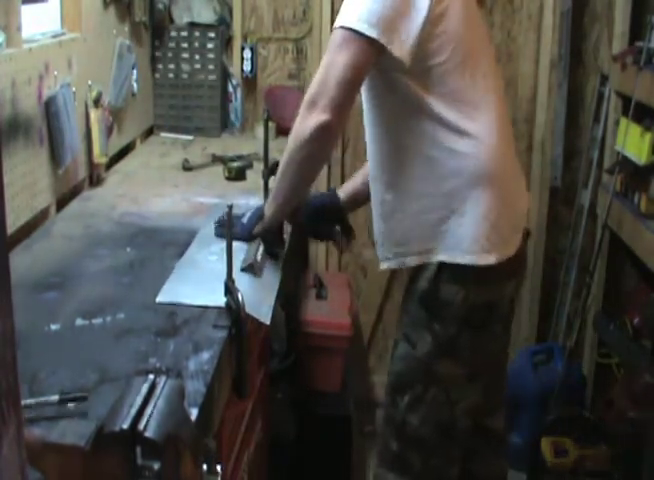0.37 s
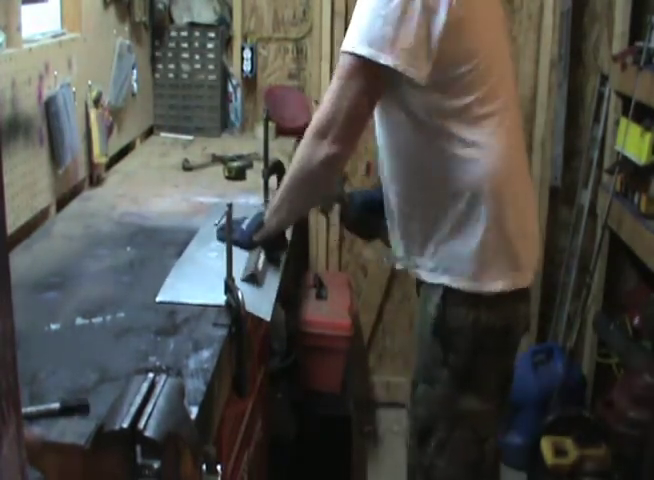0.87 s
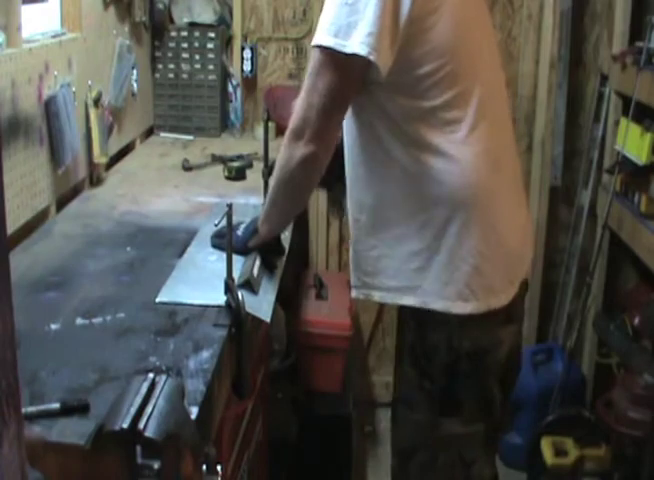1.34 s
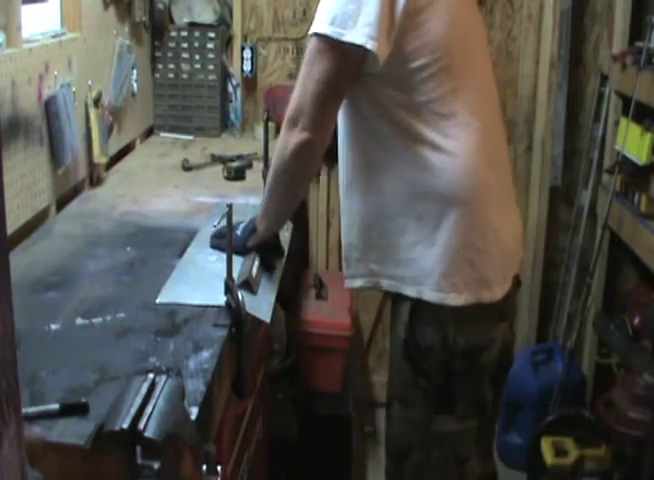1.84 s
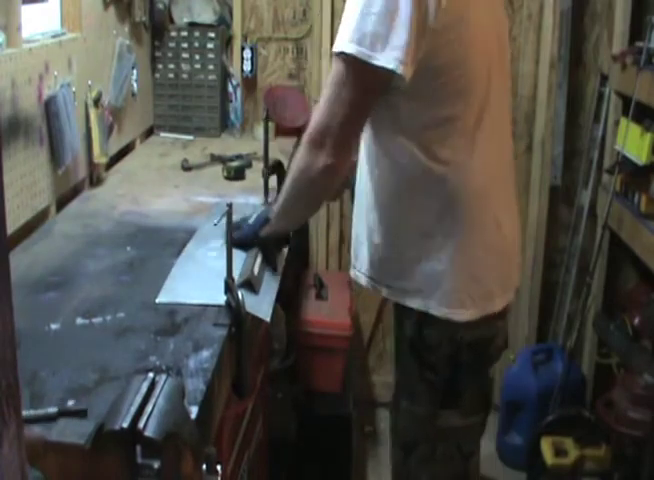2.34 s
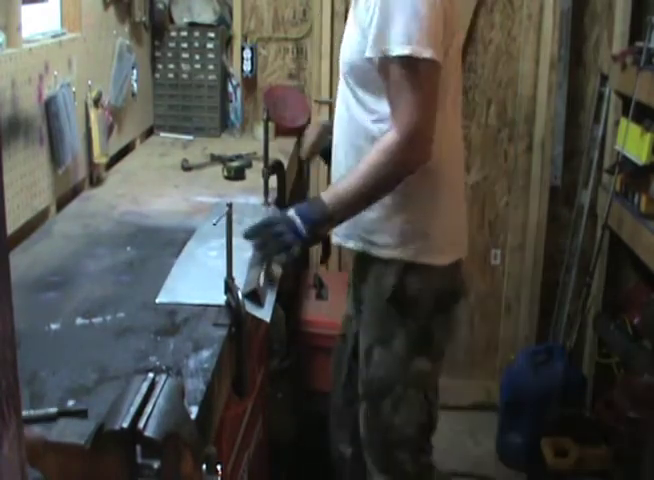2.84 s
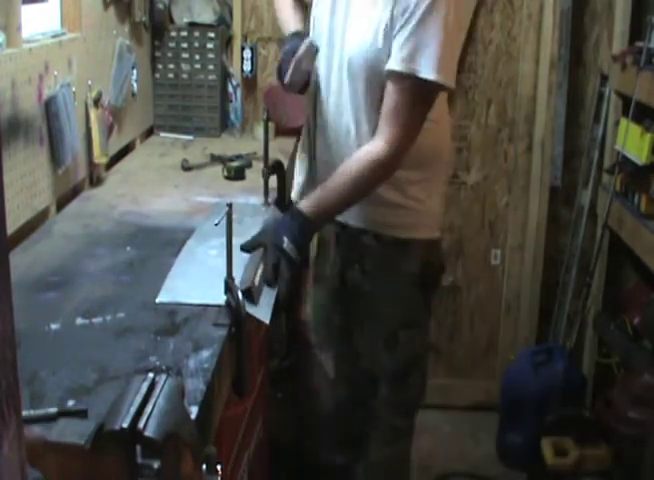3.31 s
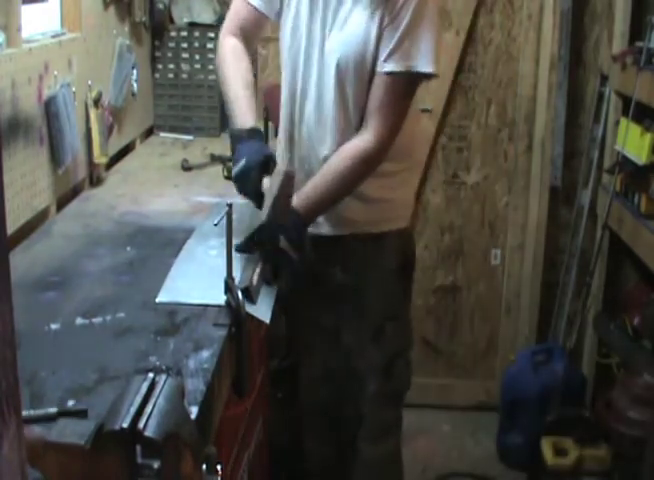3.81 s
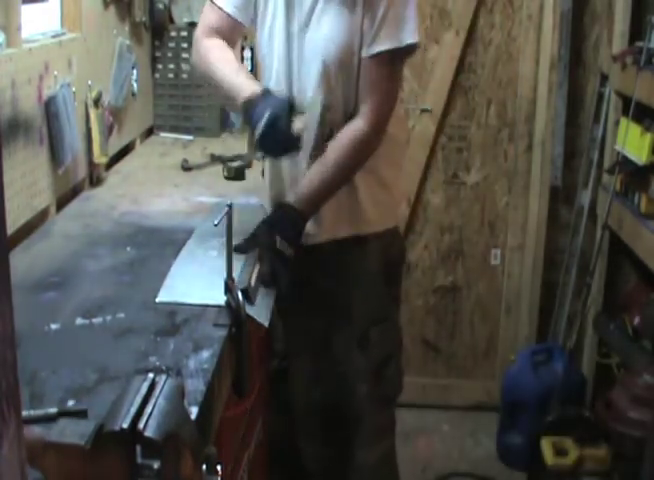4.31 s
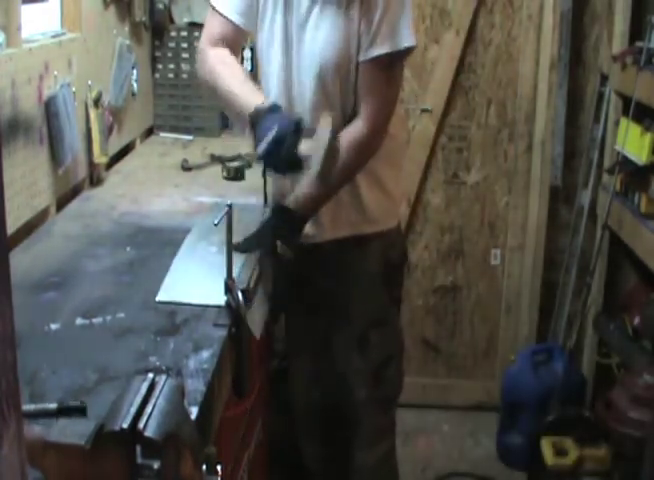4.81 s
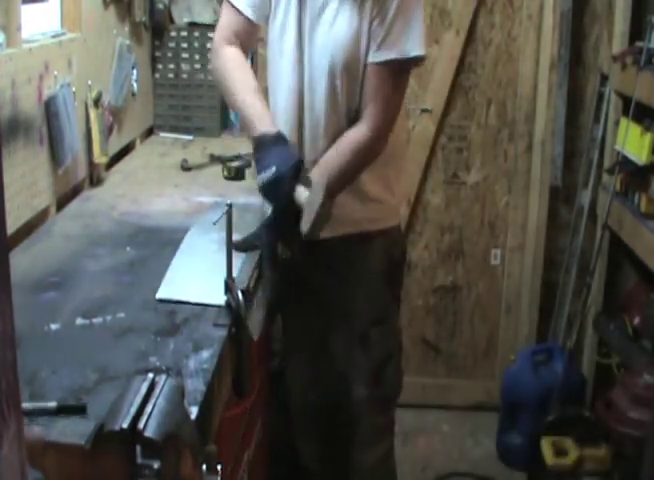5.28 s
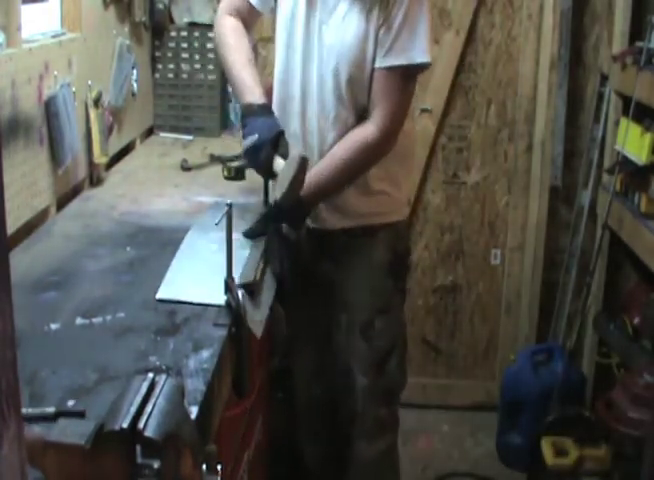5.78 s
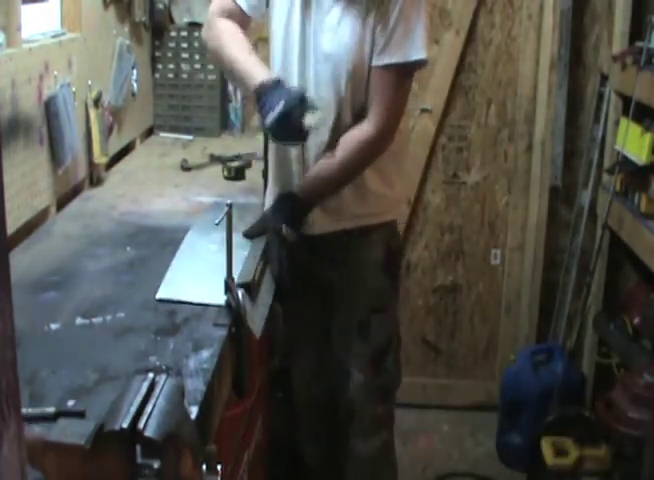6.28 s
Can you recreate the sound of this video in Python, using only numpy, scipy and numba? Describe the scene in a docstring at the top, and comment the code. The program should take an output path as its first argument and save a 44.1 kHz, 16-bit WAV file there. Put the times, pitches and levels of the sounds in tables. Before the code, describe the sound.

In a small wooden garage, a mallet hits sheet steel over a clamped bar. A ring is already fading at the start, then three hard, spaced clangs follow. A pause brings scraping, gritty sliding and soft bench knocks before more blows, some double and duller, ending on a very hard hit. A mono camera microphone squashes the loud hits over room noise and hum.

```python
"""A small wooden garage, one mono camera microphone: a mallet beats a steel sheet over a bar clamped to a bench.
Each blow rings sheet and bar as decaying modes over a dense noise wash that booms in the bench; it is far too loud
for the camera, whose gain control holds it down until the ring sinks. Between blows tool and gloves slide along
the metal as hissing strokes, loose parts rattle in bright bursts and the bench knocks softly as damped tones,
all over coloured room noise and a low mains hum of wavering tones."""
import sys
import numpy as np
from scipy import signal
from scipy.fft import rfft, irfft
from scipy.io import wavfile
from scipy.ndimage import uniform_filter1d, minimum_filter1d
from numba import njit

SR = 44100
rng = np.random.default_rng(int(sys.argv[2]) if len(sys.argv) > 2 else 0)


def unload_audio(sound):
    """Save the sound as a 16-bit wav file, at the path given as the first command line argument."""
    columns = np.transpose(np.atleast_2d(sound))
    # keep every value between -1 and 1, then stretch to whole-number steps
    steps = np.round(np.clip(columns, -1, 1) * 32767)
    wavfile.write(sys.argv[1], SR, steps.astype(np.int16))


def amp(db):
    return 10 ** (np.asarray(db, float) / 20)


N = 292824  # samples heard
LEAD = SR // 4  # samples of sound before time zero
HOLD_DB = -15.5  # level above which the slow gain control turns down


def level(x, db):
    """Scale to an rms level in dB."""
    return x * amp(db) / np.sqrt(np.mean(x ** 2))


def along(table, hz, column):
    """Read a table column at a pitch, on a log-frequency axis."""
    table = np.array(table, float)
    return np.interp(np.log(np.maximum(hz, 1)), np.log(table[:, 0]), table[:, column])


def coloured(x, table):
    """Give a white signal the spectrum of (Hz, dB) points."""
    bins_hz = np.fft.rfftfreq(len(x), 1 / SR)
    return irfft(rfft(x) * amp(along(table, bins_hz, column=1)), len(x))


def walk(rate, size):
    """Random levels held 1 / rate seconds and slewed twice; spread near 1."""
    k = int(SR / rate)
    steps = np.repeat(rng.standard_normal(size // k + 1), k)
    return 1.302 * uniform_filter1d(uniform_filter1d(steps, k), k)[:size]


def crowded(size, spread_db, spacing_hz):
    """White spectrum made lumpy by unresolved modes, some strong and some weak."""
    k = max(int(spacing_hz * size / SR), 1)
    steps = np.repeat(rng.standard_normal(size // k + 1), k)
    lumps = uniform_filter1d(steps, k)[:size // 2 + 1]
    return rfft(rng.standard_normal(size)) * amp(spread_db * lumps)


def near(hz, centre_hz, width):
    """Bell-shaped weight around a pitch, width as a log ratio."""
    return np.exp(-(np.log(hz / centre_hz) / width) ** 2)


def decay(t, t60):
    """Exponential fade that falls 60 dB in t60 seconds."""
    return np.exp(-np.log(1000) * t / t60)


def garage():
    """Room noise that swells slowly and a mains hum whose tones waver in pitch and level."""
    # Spectrum of the empty room. Each row: frequency in Hz, relative level in dB per Hz.
    room_colour = [(15, -46.5), (25, -1), (117, -3.5), (439, -6.5), (796, -3), (887, -7.5), (1480, -16.5),
                   (1650, -11), (2110, -20), (2610, -17), (3520, -24), (9320, -28.5), (16000, -36.5)]
    # Tones of the hum. Each row: frequency in Hz, rms in dB before its swells, spread of the waver in Hz.
    hum_tones = [(120.77, -52.5, 3.52), (366, -61, 3.12), (798, -58, 5.2)]
    size = N + LEAD
    room = level(coloured(rng.standard_normal(size), room_colour), -46)
    out = room * amp(1.2 * walk(3, size))
    for hz, db, waver_hz in hum_tones:
        phase = 2 * np.pi * np.cumsum(hz + waver_hz * walk(12, size)) / SR
        out += level(np.sin(phase), db) * amp(1.5 * walk(10, size))
    return out


def knocks():
    """Soft wooden bumps on the bench: one damped mode and a puff of dull noise."""
    # Each row: start in seconds, level in dB before the soft onset, pitch in Hz, t60 in seconds.
    bumps = [(2.721, -40.5, 193, 0.244), (3.514, -19.5, 231, 0.096), (3.52, -31.5, 650, 0.079),
             (3.575, -36, 242, 0.11), (5.454, -29.5, 750, 0.22), (5.455, -28, 1800, .11)]
    out, t = np.zeros(N + LEAD), np.arange(SR // 5) / SR
    for s, db, hz, t60 in bumps:
        band = signal.butter(2, [hz / 1.8, hz * 1.43], "band", fs=SR, output="sos")
        puff = signal.sosfilt(band, rng.standard_normal(len(t)))
        shape = (1 - np.exp(-t / 0.0086)) * decay(t, t60)
        mode = np.sin(2 * np.pi * hz * t)
        at = int(s * SR) + LEAD
        out[at:at + len(t)] += amp(db) * shape * (mode + level(puff, 0.5))
    return out


def slides():
    """Fine grit under tool and gloves: a dense hiss in strokes that rise and fall, each with its own body."""
    # Strokes along the metal. Each row: peak time in seconds, hiss level in dB, rise in seconds,
    # fall in seconds, level of the body over the hiss in dB before its deep part is thinned.
    strokes = [(.352, -46.5, 0.041, 0.036, 4), (.70, -53, 0.1, .12, 6), (.855, -23.5, 0.066, 0.34, -3),
               (1.07, -37.5, 0.18, 0.092, 3.5), (1.25, -40.5, .07, 0.037, 3.5),
               (1.34, -50.5, 0.18, 0.14, 1), (1.465, -43.5, .03, 0.07, -3), (1.905, -51.5, 0.018, 0.045, 1),
               (1.965, -49.5, .04, 0.029, 3.5), (2.39, -42.5, 0.12, 0.14, -1), (2.641, -29, 0.15, 0.14, -3),
               (2.66, -38.5, 0.072, 0.066, 10), (2.865, -49.5, 0.18, 0.08, 3.5),
               (3.045, -54.5, .07, .07, 5), (3.16, -44.5, 0.039, 0.072, 0.5), (3.3, -42, 0.076, .12, 2.5),
               (3.38, -42, 0.12, 0.085, -4), (3.5, -50.5, 0.047, 0.1, 6), (3.629, -44.5, 0.052, 0.05, -0.5),
               (3.735, -50.5, .06, 0.085, -6), (3.87, -43, 0.071, 0.1, -2.5),
               (3.965, -38, 0.067, 0.079, -3), (4.052, -39.5, 0.027, 0.036, -1), (4.1, -46, 0.037, .04, 1),
               (4.53, -60, .05, .05, 3), (4.598, -41.5, 0.025, 0.041, 0), (4.95, -47, 0.099, 0.059, -5),
               (5.118, -47, 0.033, 0.03, -1), (5.55, -43.5, 0.22, 0.21, -0.8),
               (5.68, -39, 0.062, 0.066, -5.5), (5.825, -31.5, 0.13, 0.11, -5.5),
               (6.031, -49.5, 0.067, .11, 1.5), (6.36, -53, .11, .05, 5), (6.56, -49, 0.026, 0.053, -1)]
    # Spectrum of the grit. Each row: frequency in Hz, relative level in dB per Hz.
    grit_colour = [(180, -43.5), (300, -20), (433, -14), (634, -3.5), (1150, 3), (1390, 4), (3290, 1.5),
                   (9390, -6), (13800, -13), (16000, -22)]
    stroke_curve = 1.73  # exponent of the fade in dB: 1 pointed, 2 rounded
    body_linger = 1.32  # the body of a stroke dies this much slower than its hiss
    deep_hz, thinning = 1100, 0.32  # a louder stroke loses this many dB below deep_hz per dB of level
    size = N + LEAD
    t = (np.arange(size) - LEAD) / SR

    grains = irfft(crowded(size, 1.8, 50), size) * amp(2.0 * rng.standard_normal(size))
    grit = coloured(grains, grit_colour) * amp(1.02 * walk(60, size))
    low = signal.sosfiltfilt(signal.butter(2, 3500, fs=SR, output="sos"), grit)

    hiss_power, body_power = np.zeros(size), np.zeros(size)
    for s, db, rise, fall, body_db in strokes:
        # the hiss is 20 dB down one rise before and one fall after its peak
        span = slice(np.searchsorted(t, s - 2 * rise), np.searchsorted(t, s + 3 * fall))
        before = t[span] < s
        away = np.abs(t[span] - s) / np.where(before, rise, fall)
        hiss_power[span] += amp(2 * (db - 20 * away ** stroke_curve))
        slower = away / np.where(before, 1, body_linger)
        body_power[span] += amp(2 * (db + body_db - 20 * slower ** stroke_curve))

    low, hiss = level(low, 0), level(grit - low, 0)
    deep = signal.sosfiltfilt(signal.butter(2, deep_hz, fs=SR, output="sos"), low)
    # thinning starts where the body exceeds -39 dB, a power of amp(-78)
    thin = np.minimum(1, (amp(-78) / (body_power + 1e-12)) ** (thinning / 2))
    body = low - (1 - thin) * deep
    return np.sqrt(hiss_power) * hiss + np.sqrt(body_power) * body


def rattles():
    """Loose parts chattering against the sheet: short bright noise bursts for many tiny contacts."""
    # Each row: start in seconds, rms in dB before the burst is shaped, t60 in seconds.
    chatters = [(0.321, -39, 0.19), (0.681, -42.5, 0.12), (1.449, -41.5, 0.294), (1.897, -43, 0.08),
                (3.1305, -40.5, 0.18), (3.4685, -40, 0.145), (4.171, -21, 0.34), (4.242, -28, 0.314),
                (4.30, -32.5, 0.31), (4.785, -19, 0.148), (5.999, -45, 0.28), (6.141, -11, 0.095),
                (6.32, -35, 0.0484), (6.54, -51.5, 0.15)]
    # Spectrum of the chatter. Each row: frequency in Hz, relative level in dB per Hz.
    chatter_colour = [(400, -30.5), (1500, 11), (5000, 7.5), (10000, 4), (16000, -15)]
    out, t = np.zeros(N + LEAD + SR), np.arange(SR // 3) / SR
    for s, db, t60 in chatters:
        burst = level(coloured(rng.standard_normal(len(t)), chatter_colour), db)
        at = int(s * SR) + LEAD
        out[at:at + len(t)] += burst * (1 - np.exp(-t / .0015)) * decay(t, t60)
    return out[:N + LEAD]


def wash(t, bright_hz, boom_db, treble_db, longer):
    """Modes too dense to tell apart: each third-octave builds up and dies at its own pace, the bass late."""
    # Sheet, bench and walls after a blow. Each row: frequency in Hz, relative level in dB per Hz,
    # t60 in seconds before the blow's length factor, build-up in seconds.
    dense_modes = [(30, -8, 0.68, 0.063), (90.5, -2.5, 0.56, 0.0233), (154, -6.5, 0.48, 0.0304),
                   (222, -3.5, 0.47, 0.023), (406, -7, 0.39, 0.0096), (764, -5, 0.37, 0.0069),
                   (1437, -5.5, 0.37, 0.00059), (2400, -5, 0.39, 0.0011), (3930, -5.5, 0.34, 0.001),
                   (7000, -7, 0.28, 0.0044), (10150, -10, 0.23, 0.0035), (15770, -21.5, 0.17, 0.0017)]
    bar_hz = 690
    noise = crowded(len(t), 2.7, 50)
    bins = np.log2(np.fft.rfftfreq(len(t), 1 / SR) + 1)
    out = 0
    for octave in np.arange(14, 43) / 3:
        hz = 2 ** octave
        window = np.cos(np.pi / 2 * np.clip(3 * (bins - octave), -1, 1)) ** 2
        band = irfft(noise * window, len(t))
        boom = boom_db * (1 - 0.53 / (1 + (hz / 110) ** 4)) / (1 + (hz / 480) ** 6)
        treble = treble_db / (1 + (5000 / hz) ** 2)
        db = along(dense_modes, hz, column=1) + boom + treble
        # blows right over the bar shake the bench less and ring the bar more
        db = db - .5 * boom_db * near(hz, bar_hz, 0.27) + 3 * near(hz, bright_hz, 0.39)
        t60 = longer * along(dense_modes, hz, column=2)
        clank = amp(-7.0) * near(hz, bright_hz, 0.17) * decay(t, 0.093)
        # bench and floor rumble on faintly after the sheet has gone quiet
        rumble = amp(-31.5 - boom_db) / (1 + (hz / 600) ** 2) * decay(t, 1.96) * (1 - t)
        fade = decay(t, t60) + clank + rumble
        build_up = 1 - np.exp(-t / along(dense_modes, hz, column=3))
        out = out + amp(db) * band * fade * build_up
    return out


def rings(t, modes, bright_hz):
    """The spot that is struck favours the modes near one pitch; every blow shares its force out anew."""
    hz, db, t60 = np.transpose(modes)[:, :, None]
    luck = rng.standard_normal((len(modes), 3)).T[:, :, None]
    db = db + 2.0 * luck[0] + 7 * near(hz, bright_hz, 0.055)
    # the metal keeps flexing, so its modes drift in pitch and waver in level
    drift = 1 + 0.00316 * luck[1] + 0.0072 * np.array([walk(47.4, len(t)) for _ in modes])
    waver = amp(2.1 * np.array([walk(37.0, len(t)) for _ in modes]))
    phase = 2 * np.pi * (np.cumsum(hz * drift, axis=1) / SR + luck[2])
    return (amp(db) * waver * np.sin(phase) * decay(t, t60)).sum(axis=0)


def blows():
    """Mallet on sheet: rings over the wash; a weaker blow keeps contact longer, so it starts softer."""
    # Each row: start in seconds, strength in dB over the gain control's holding level,
    # brightest ring in Hz, boom of the bench in dB, ring length factor of the wash.
    strikes = [(-.14, 20.5, 2060, -0.5, 1.16), (0.363, 23.5, 2450, -0.4, 1.064),
               (1.5156, 20, 2030, -2, 1.17), (1.9919, 22.5, 2130, -0.5, 1.124),
               (4.116, 8.5, 2780, -4, 1.29), (4.172, 4, 1450, -6.5, 1.24), (4.6079, 23.5, 2400, -1, 1.097),
               (5.1290, 25, 3050, -1.5, 1.033), (6.1146, 8.5, 1730, -9.5, 1.13),
               (6.186, 1, 1640, -2.5, 1.2), (6.5768, 30, 1830, -4.5, 1.1)]
    # Clearest modes of the sheet. Each row: mean frequency in Hz, relative level in dB, t60 in seconds.
    sheet_modes = [(822, -6, 0.29), (960, -3, 0.153), (1310, -22, 0.26), (1738, -1, 0.28),
                   (2003, -3, 0.081), (2300, -2, 0.25), (2421, -12, 0.26), (2760, -34, 0.14),
                   (2950, -7, 0.19), (3160, -7, 0.135), (4143, -2, 0.27), (4540, -19, 0.11), (5760, -6, .2),
                   (6240, -5, 0.14), (7360, -17, 0.17), (8460, -10, 0.24), (9060, -22, 0.47)]
    # Modes of the clamped bar. Each row: mean frequency in Hz, relative level in dB, t60 in seconds.
    bar_modes = [(589, -3, 0.61), (665, 2.5, 0.4), (791, -6, 0.29), (1497, 3.5, 0.25), (1614, 3.5, 0.42),
                 (2680, -4.5, 0.36), (2950, 2, 0.41), (4340, -5, 0.29)]
    # a weak blow is dull: treble gained per dB of strength, strengths where it is neutral and stops growing
    treble_per_db, neutral_db, brightest_db = 1.04, 20.5, 22.5
    out, t = np.zeros(N + LEAD + SR), np.arange(SR) / SR
    for s, db, bright_hz, boom_db, longer in strikes:
        treble_db = treble_per_db * (min(db, brightest_db) - neutral_db)
        push = 1 - np.exp(-t * amp(db) / 0.0054)
        # right over the bar the sheet is held still and the bar rings instead
        sheet = amp(-11.5 + 0.41 * boom_db) * rings(t, sheet_modes, bright_hz)
        bar = amp(-25 - 0.95 * boom_db) * rings(t, bar_modes, bright_hz)
        # the struck sheet slaps the bar and makes the wash uneven
        clatter = amp(1.02 * walk(170.1, SR))
        sound = 3.4 * wash(t, bright_hz, boom_db, treble_db, longer) * clatter + sheet + bar
        at = int(s * SR) + LEAD
        out[at:at + SR] += amp(db + HOLD_DB) * push * sound
    return out[:N + LEAD]


@njit
def squeeze(x, peak, top, attack, release, slope):
    """Gain control: follow the peak level, smoothed twice, and turn down what exceeds the top."""
    y, follower, smooth = np.empty(len(x)), 1e-9, 1e-9
    for i in range(len(x)):
        follower += (peak[i] - follower) * (attack if peak[i] > follower else release)
        smooth += (follower - smooth) * attack
        y[i] = x[i] * min(1., (top / smooth) ** slope)
    return y


def scene():
    """The camera's gain control acts on all of it: a quick stage catches the peak, a slower one settles after it."""
    x = garage() + knocks() + slides() + rattles() + blows()
    # the quick stage sees peaks a millisecond ahead, and what still exceeds it bends softly
    ahead = -minimum_filter1d(-np.abs(x), size=97)
    x = np.tanh(squeeze(x, ahead, amp(-5.5), 1 / (0.00026 * SR), 1 / (0.0092 * SR), 0.78))
    # the slow stage reacts late, so the first crack of a hard blow gets through
    late = np.roll(np.abs(x), int(0.012 * SR))
    x = squeeze(x, late, amp(HOLD_DB), 1 / (0.0047 * SR), 1 / (0.014 * SR), 0.52)
    return np.array([x[LEAD:], x[LEAD:]])


def top_cut(x):
    """A second steep cut removes everything above 16.5 kHz."""
    return signal.sosfilt(signal.butter(12, 16480, fs=SR, output="sos"), x)


def record(dry):
    """The camera cuts the top steeply above 15.7 kHz."""
    low_pass = signal.ellip(8, .2, 60, 15700, fs=SR, output="sos")
    mix = signal.sosfilt(low_pass, dry)
    return top_cut(mix)


dry = scene()
out = record(dry)
unload_audio(out)
```